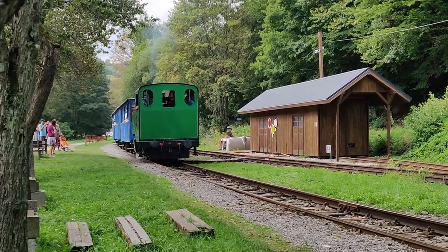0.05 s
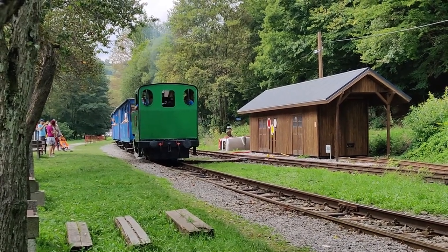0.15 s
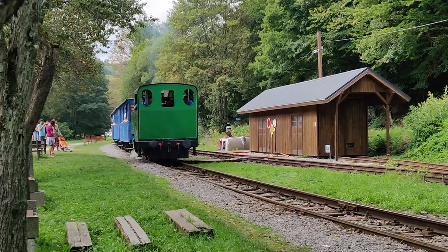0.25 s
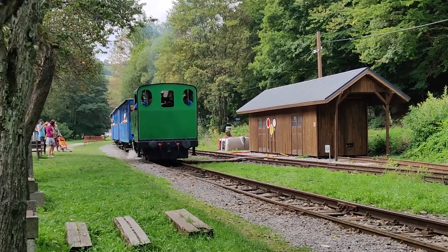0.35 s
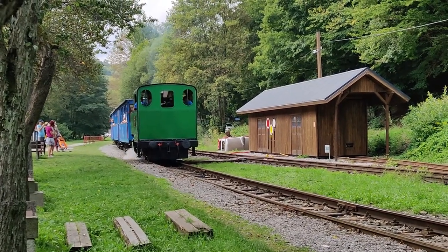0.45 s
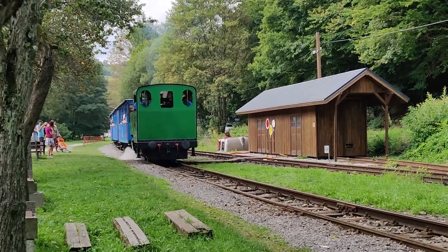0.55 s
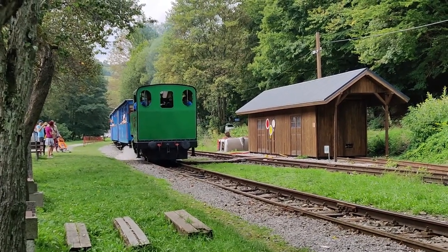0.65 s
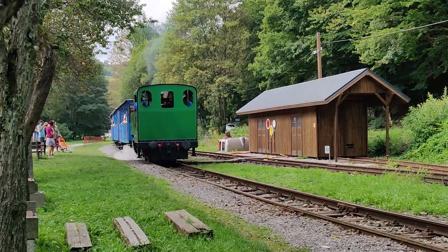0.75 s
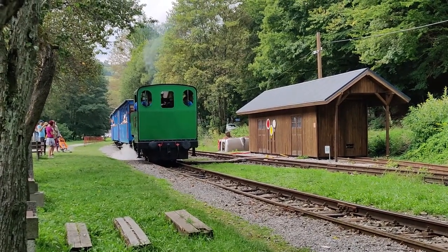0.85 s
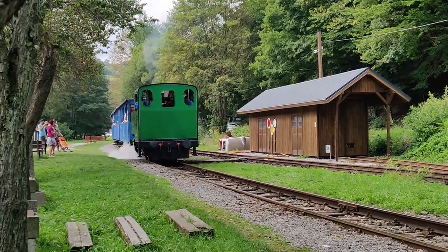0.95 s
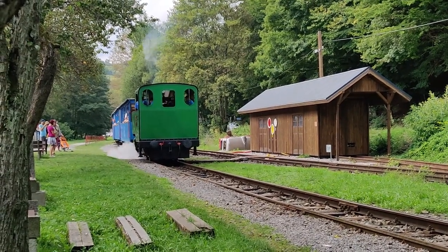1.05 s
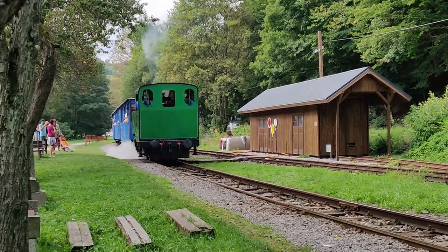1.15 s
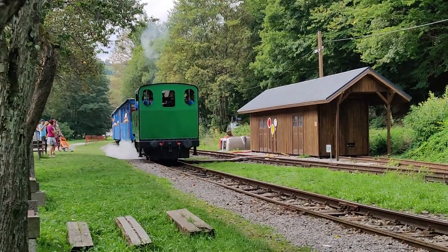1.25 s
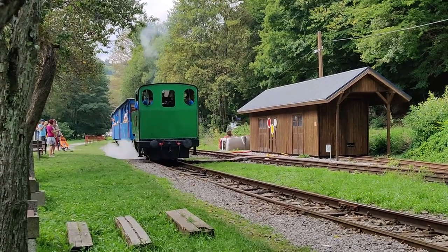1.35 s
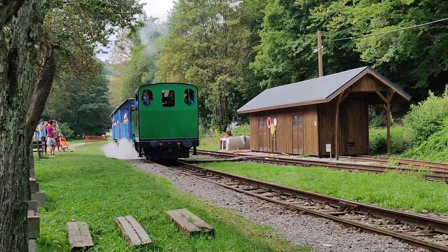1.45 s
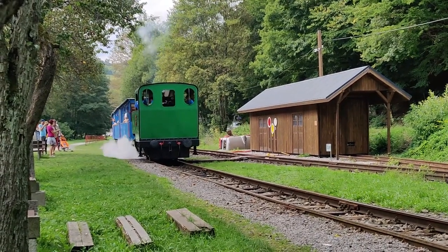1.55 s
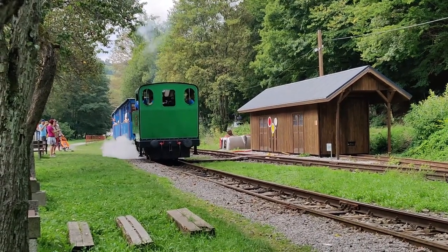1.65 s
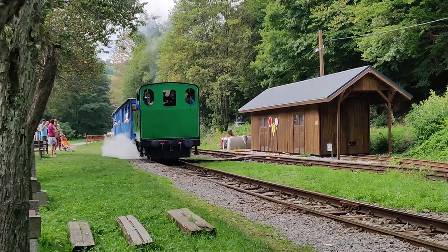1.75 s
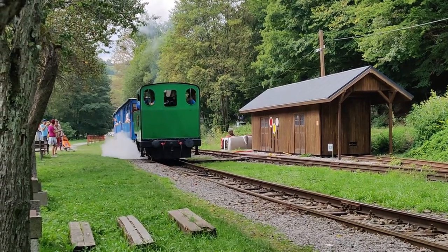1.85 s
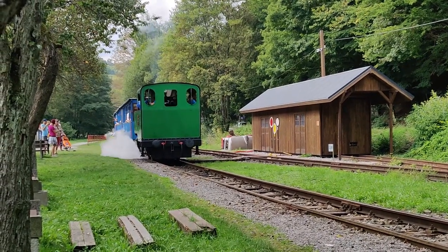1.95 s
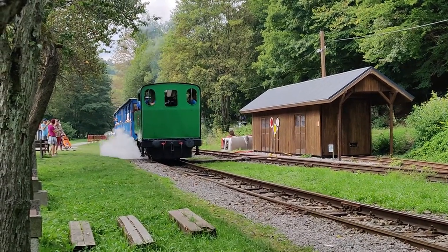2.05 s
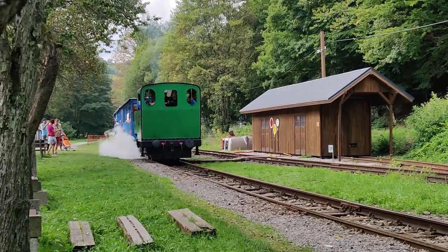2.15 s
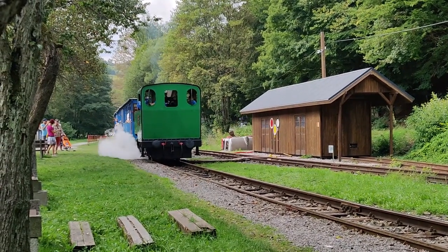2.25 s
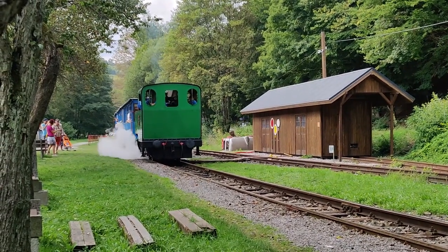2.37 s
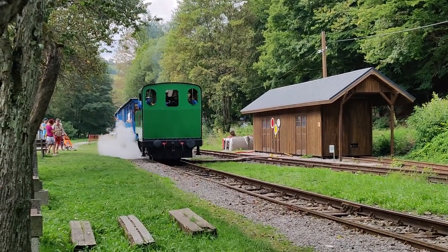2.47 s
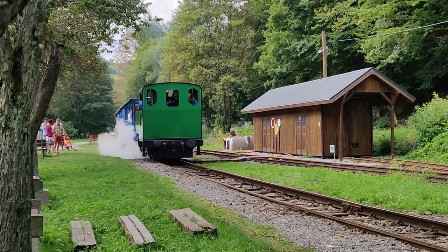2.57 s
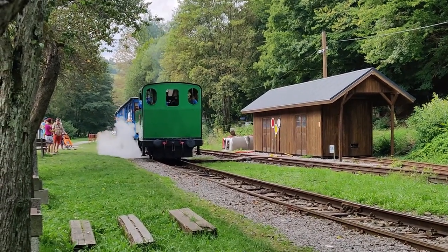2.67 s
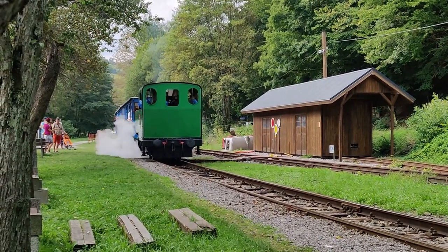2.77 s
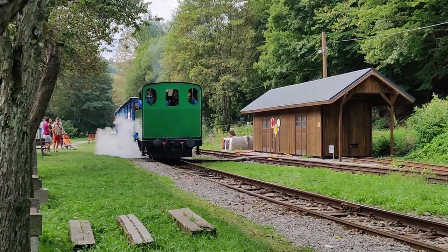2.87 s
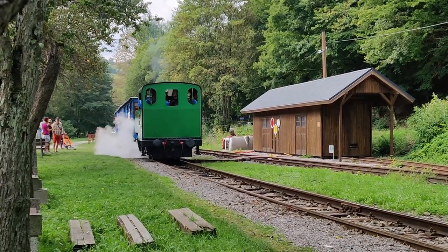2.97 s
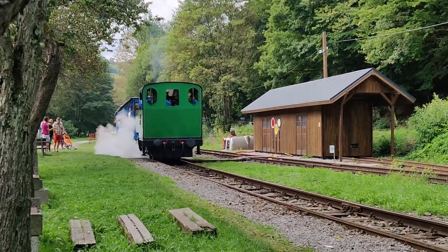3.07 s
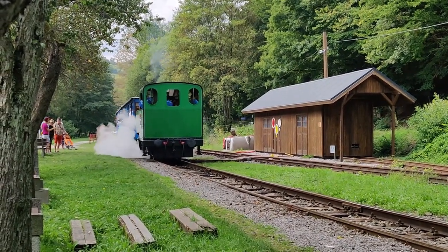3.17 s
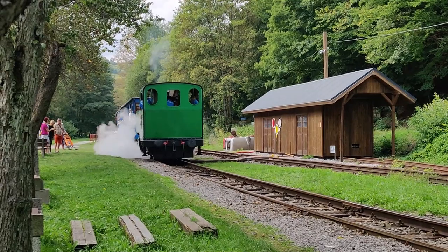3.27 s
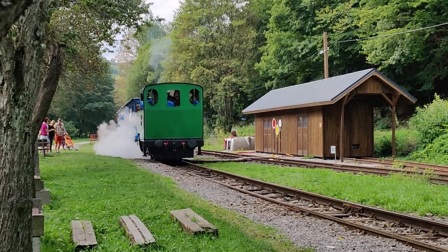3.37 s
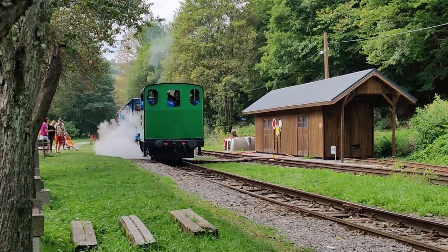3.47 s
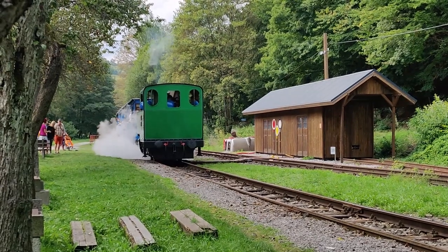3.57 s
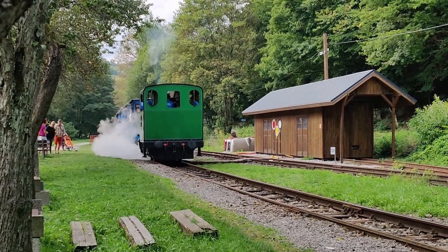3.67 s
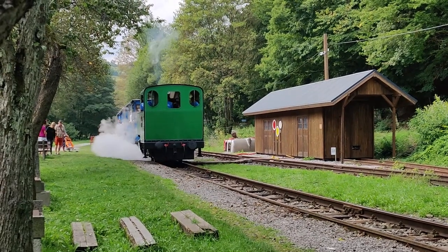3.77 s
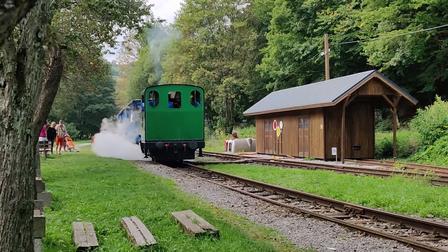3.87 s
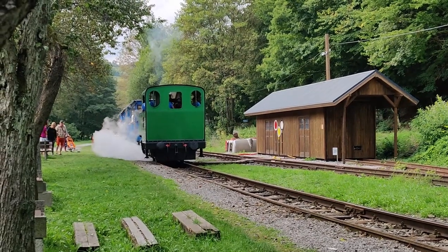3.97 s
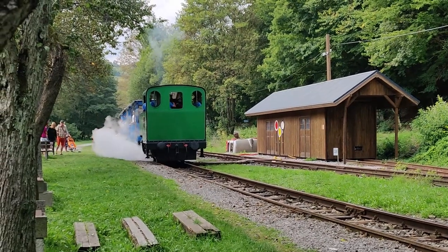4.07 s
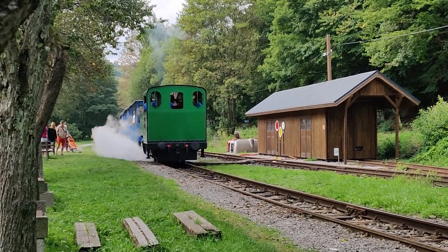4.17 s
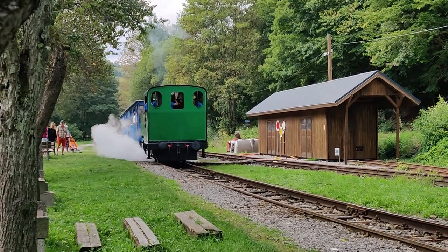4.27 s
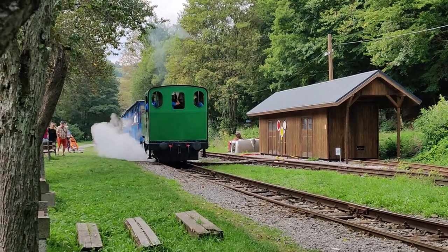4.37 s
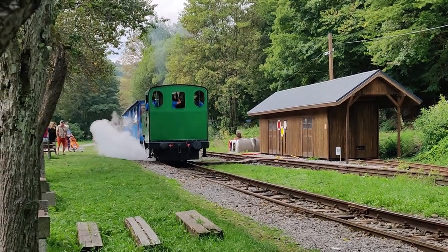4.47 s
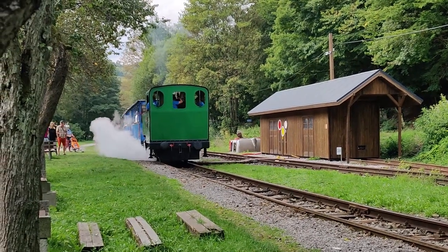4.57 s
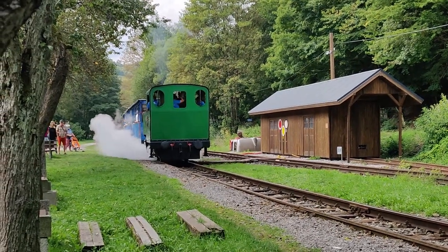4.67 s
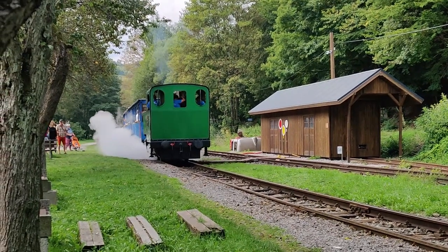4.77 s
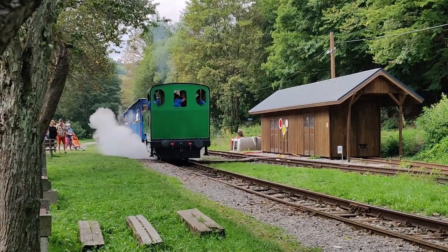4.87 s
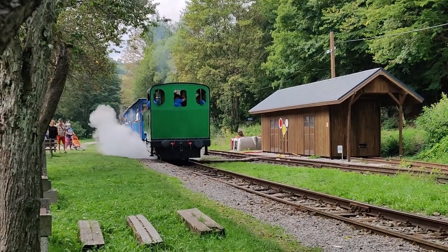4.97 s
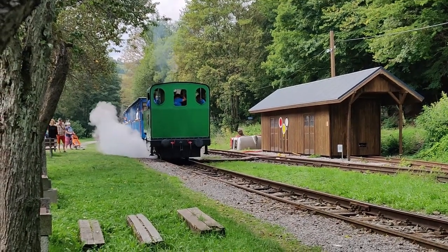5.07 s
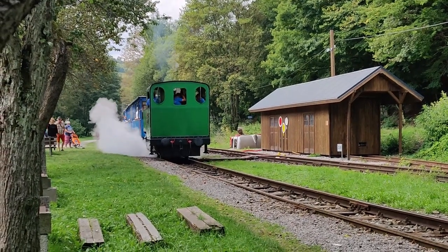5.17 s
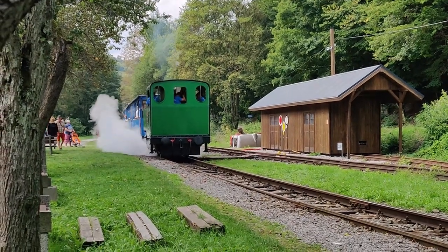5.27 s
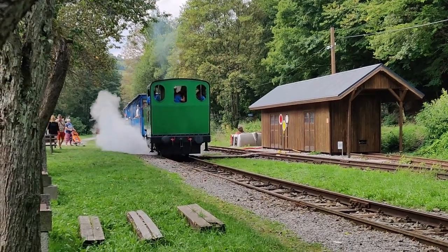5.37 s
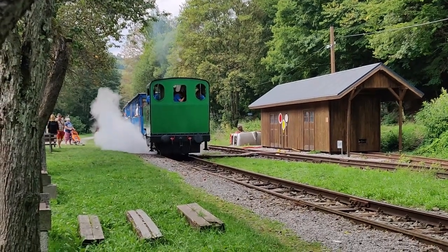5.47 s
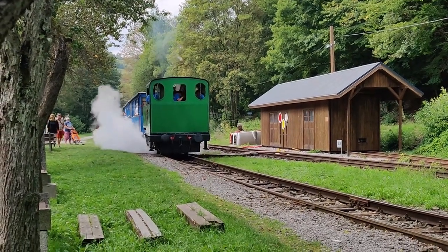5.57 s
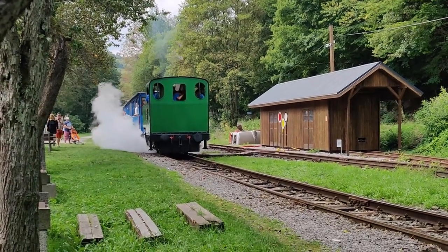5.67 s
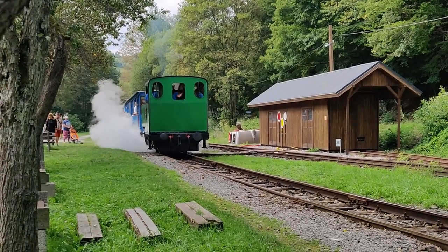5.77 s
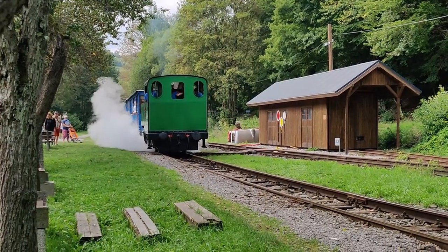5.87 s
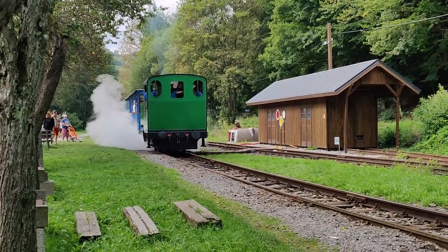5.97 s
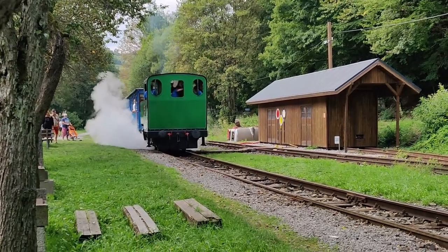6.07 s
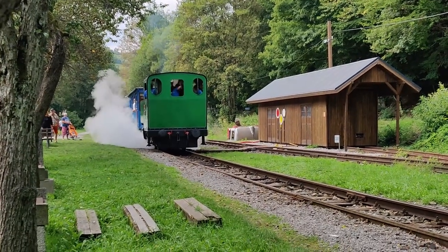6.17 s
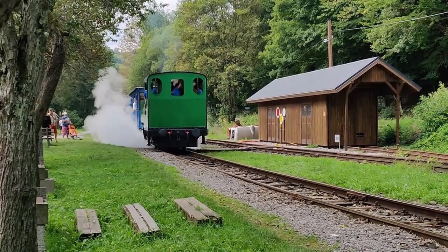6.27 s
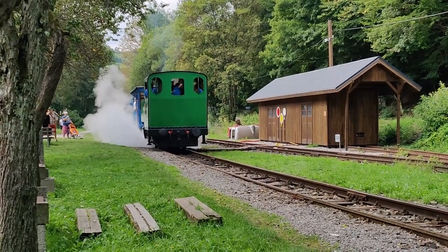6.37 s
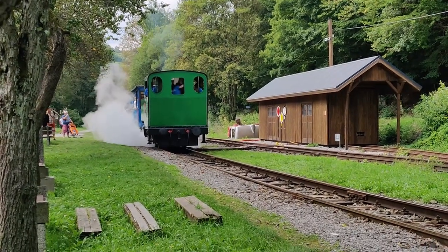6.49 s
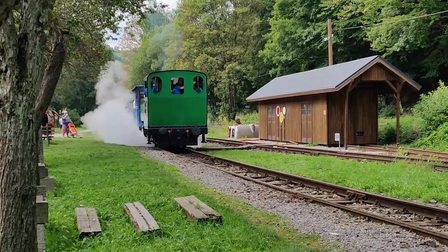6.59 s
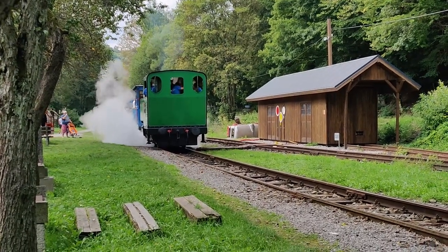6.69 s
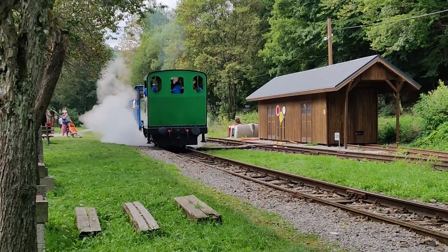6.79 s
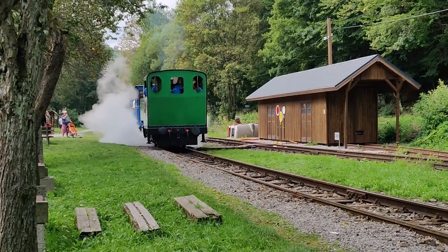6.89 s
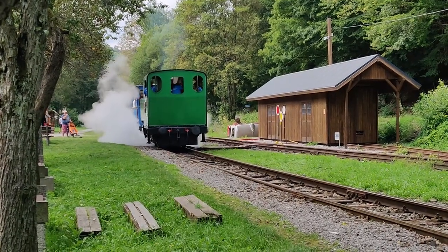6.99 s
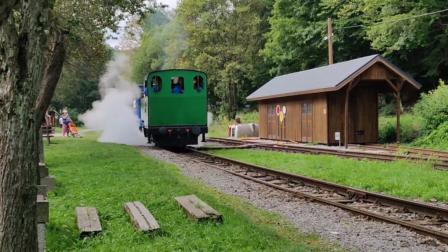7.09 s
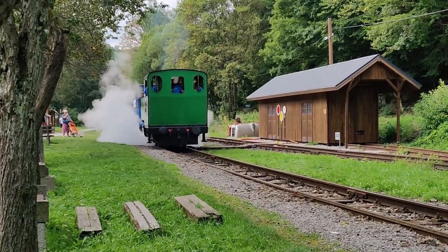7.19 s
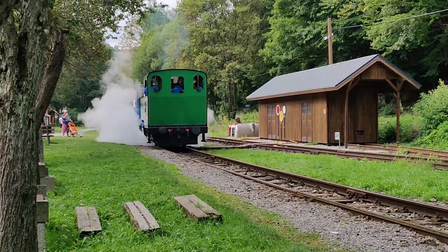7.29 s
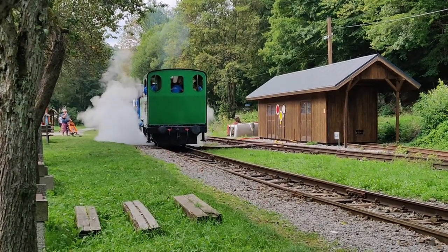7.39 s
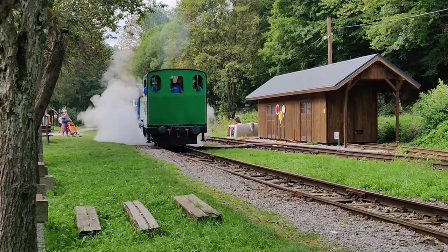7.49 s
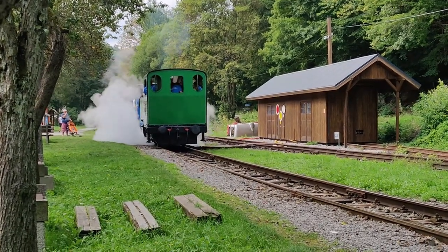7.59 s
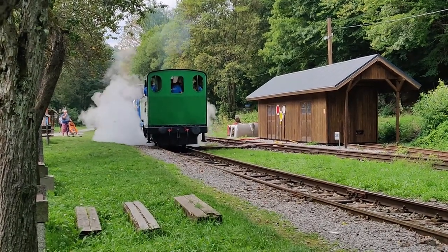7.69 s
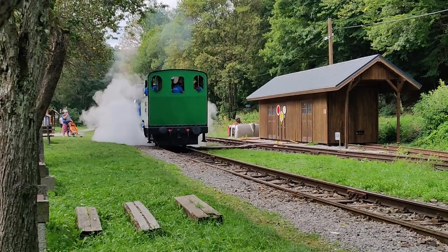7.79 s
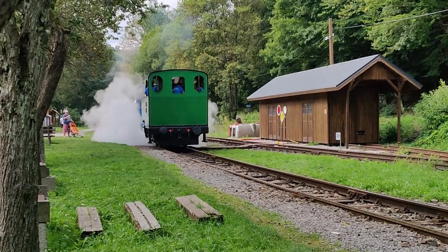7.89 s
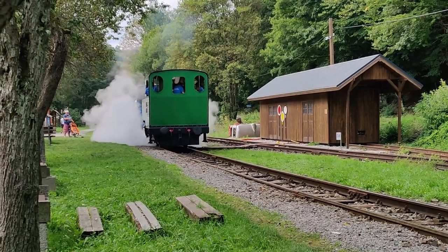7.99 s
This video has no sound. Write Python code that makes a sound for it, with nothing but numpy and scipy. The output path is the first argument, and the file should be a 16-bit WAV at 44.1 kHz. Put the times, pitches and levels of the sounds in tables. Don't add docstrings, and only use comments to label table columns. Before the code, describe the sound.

A steam locomotive stands at a small woodland station, heard from some way off in stereo. A wavering low hum and soft fire rumble come first; almost at once a steam jet opens, swells to a loud broad hiss by about two and a half seconds, then drops and continues steadily. Faint metal squeaks and thumping wind on the hand-held microphone accompany it, with trees scattering the hiss.

```python
import sys
import numpy as np
from scipy import signal
from scipy.fft import rfft, irfft
from scipy.io import wavfile
from scipy.ndimage import uniform_filter1d

SR = 44100
rng = np.random.default_rng(int(sys.argv[2]) if len(sys.argv) > 2 else 0)


def attenuation_scalar(level_db):
    decades = np.asarray(level_db, float) / 20
    return 10 ** decades


def generate_wav(sig):
    pcm = np.round(np.clip(np.atleast_2d(sig).T, -1, 1) * 32767).astype(np.int16)
    wavfile.write(sys.argv[1], SR, pcm)


N = 354563

SIZE, HOP = 1024, 256
HZ = np.fft.rfftfreq(SIZE, 1 / SR)
TIMES = np.arange(N // HOP + 3) * HOP / SR
SECONDS = np.arange(N) / SR


def evened(x):
    return x / np.sqrt(np.mean(abs(x) ** 2) + 1e-20)


def read(points, hz=HZ):
    f, value = np.transpose(points)
    return np.interp(np.log(hz + 1), np.log(f + 1), value)[:, None]


def curves(rows, t):
    s, *columns = np.transpose(rows)
    return [np.interp(t, s, c) for c in columns]


def sides(db):
    return attenuation_scalar(np.array([db / 2, -db / 2]))


def slow(count, size, length=N):
    noise = rng.standard_normal((count, length))
    return [evened(uniform_filter1d(uniform_filter1d(v, size), size)) for v in noise]


def field(count):
    a, b = rng.standard_normal((2, count, len(HZ), len(TIMES)))
    return (a + 1j * b) / np.sqrt(2)


def patches(bins, frames):
    x = rng.standard_normal((len(HZ), len(TIMES)))
    return evened(uniform_filter1d(uniform_filter1d(x, bins, 0), frames, 1))


def sound(z):
    return signal.istft(z, nperseg=SIZE, noverlap=SIZE - HOP)[1][:, :N]


def coherent(a, b, likeness):
    same = np.clip(likeness, 0, 1)
    return np.array([a, same * a + np.sqrt(1 - same ** 2) * b])


def long_noise(spectrum):
    hz = np.fft.rfftfreq(N, 1 / SR)
    return rfft(rng.standard_normal((2, N))) * attenuation_scalar(read(spectrum, hz).T), hz


def air():
    # (frequency [Hz], density [dB per Hz])
    air_colour = [(120, -40), (200, -9), (400, -16.5), (630, -11), (1000, -11), (2000, -19.5),
                  (4000, -26.5), (8000, -33), (11000, -45), (15700, -40)]
    level_db = -48.3
    likeness = read([(200, 1.0), (1000, 0.21), (8000, 0.13)])
    z = coherent(*field(count=2), likeness) * attenuation_scalar(read(air_colour) + patches(bins=10, frames=12))
    return attenuation_scalar(level_db) * evened(sound(z))


def fire():
    # (frequency [Hz], density [dB per Hz])
    rumble_colour = [(15, 6), (40, -2), (75, 1), (100, -3.5), (140, -3), (210, -5.5), (300, -14),
                     (450, -21.5), (900, -42)]
    # (frequency [Hz], share alike [0-1])
    rumble_likeness = [(20, 0.57), (60, 0.96), (140, 1), (300, 0.84), (900, 0.42)]
    start_db, growth_db_per_s, lump_db = -42, 0.68, 0.5
    (a, b), hz = long_noise(rumble_colour)
    x = evened(irfft(coherent(a, b, read(rumble_likeness, hz)[:, 0]), N))
    level_db = start_db + growth_db_per_s * SECONDS + lump_db * slow(count=1, size=4000)[0]
    return x * attenuation_scalar(level_db) * sides(1.0)[:, None]


def blower():
    # (time [s], pitch [Hz], level [dB])
    blower_course = [
        (0, 114, -46),
        (.45, 108.5, -46.5),
        (1.4, 111.3, -46.5),
        (2.75, 115.6, -44),
        (3.7, 115, -46.5),
        (4.3, 116.6, -42),
        (5.4, 118.4, -43.5),
        (6.8, 118, -40.5),
        (7.75, 119.7, -36),
        (8.04, 121, -42.5),
    ]
    # (pitch ratio [1], relative level [dB])
    shaft_orders = [
        (.8, -10.5),
        (1.2, -12),
        (1.47, -18.5),
    ]
    wobble_hz, throb_db, order_throb_db = 1.2, 2.0, 3.0
    hz, db = curves(blower_course, SECONDS)
    wobble, throb, *order_throbs = slow(count=2 + len(shaft_orders), size=3000)
    phase = 2 * np.pi * np.cumsum(hz + wobble_hz * wobble) / SR
    tone = attenuation_scalar(throb_db * throb) * np.sin(phase)
    for (ratio, rel_db), order_throb in zip(shaft_orders, order_throbs):
        tone = tone + attenuation_scalar(rel_db + order_throb_db * order_throb) * np.sin(ratio * phase)
    return np.sqrt(2) * tone * attenuation_scalar(db) * sides(1.5)[:, None]


def squeaks():
    # (time [s], length [s], pitch [Hz], level [dB], left minus right [dB])
    strain_tones = [(0.0, 0.16, 635, -52, 0), (0.172, .2, 630, -55.5, 0), (.37, 0.13, 184, -40.5, 1),
                    (.5, .38, 630, -54, -1), (.72, 0.11, 720, -51, -2), (0.632, 0.15, 211.5, -50, 0),
                    (2.8, 0.27, 630, -53, -4), (4.585, 0.2, 701, -49, 0), (4.599, 0.239, 636, -49, 1),
                    (5.721, 0.12, 2200, -46, 3), (7.063, 0.36, 1085, -49, -9), (7.27, .14, 213, -47, 0),
                    (7.3, 0.21, 1060, -52, 8)]
    # (time [s], length [s], start pitch [Hz], end pitch [Hz], level [dB])
    pipe_moan = (0.1, 1.3, 63.5, 77, -46.5)
    sag_per_s, fuzz = 0.06, 0.0272
    glides = [(*pipe_moan, 0)]
    for s, length, hz, db, pan_db in strain_tones:
        glides.append((s, length, hz, hz * (1 - sag_per_s * length), db, pan_db))
    out = np.zeros((2, N))
    for s, length, start_hz, end_hz, db, pan_db in glides:
        n = round(length * SR)
        wobble = evened(uniform_filter1d(rng.standard_normal(N // 4), 400))[:n]
        hz = np.linspace(start_hz, end_hz, n) * (1 + fuzz * wobble)
        tone = np.sqrt(2) * np.sin(2 * np.pi * np.cumsum(hz) / SR) * signal.windows.tukey(n, 0.6)
        out[:, round(s * SR):][:, :n] += attenuation_scalar(db) * sides(pan_db)[:, None] * tone
    return out


def gusts():
    # (time [s], peak level [dB], left minus right [dB])
    gust_peaks = [(0.0, -33.5, 8), (.3, -38, 2), (.67, -35, -12), (1.0, -38, 4), (1.75, -35, 9.5),
                  (2.03, -27, 1), (2.2, -34, -3), (2.65, -39, 2), (2.4, -36.5, -4), (3.0, -41, 0),
                  (3.35, -38.5, -2), (3.65, -38, 0), (3.85, -32, 0), (4.25, -31.5, 1), (4.55, -41, 1),
                  (4.78, -33, -10), (5.04, -32, 5), (5.36, -30.5, 7), (5.6, -33, 9), (5.95, -32, 10),
                  (6.22, -32, 4), (6.55, -35, 0), (7.1, -38, -5), (7.3, -42, 0), (7.57, -37, 14),
                  (8.02, -33, 9)]
    gust_s, calm_db = 0.086, -42
    power = attenuation_scalar(2 * calm_db)
    for s, db, pan_db in gust_peaks:
        bell = np.exp(-0.5 * ((TIMES - s) / gust_s) ** 2)
        power = power + (attenuation_scalar(db) * sides(0.61 * pan_db)[:, None] * bell) ** 2
    return np.array([np.interp(SECONDS, TIMES, np.sqrt(p)) for p in power])


def wind():
    # (frequency [Hz], density [dB per Hz])
    wind_colour = [(3, -4), (10, 8), (16, -2), (25, 1), (45, -0.5), (80, -10.5), (150, -27), (300, -58)]
    # (time [s], peak level [dB], frequency [Hz], length [cycles], left minus right [dB])
    buffet_events = [(.27, -29, 35, 1.5, 14), (.47, -29, 38, 2.1, 13), (1.56, -32, 65, 5.7, 24),
                     (1.69, -32, 55, 2.3, 21), (1.775, -30, 60, 2.6, 26), (1.995, -24.5, 36, 1.1, 9),
                     (2.05, -27, 25, 1.1, 6), (2.71, -28.5, 40, 1.7, 10), (2.74, -32, 70, 4.9, 1),
                     (4.996, -25, 60, 2, 2), (5.04, -32, 30, 1.6, 14), (5.33, -23.5, 36.6, 1.5, 25),
                     (5.479, -25, 45, 2.1, 17), (5.935, -25, 42, 1.8, 13), (7.41, -43, 45, 1.8, 3)]
    x = irfft(long_noise(wind_colour)[0], N)
    x = x / abs(uniform_filter1d(x ** 2, 4000)) ** 0.25
    out = evened(x) * attenuation_scalar(-1.5) * gusts()
    for s, db, hz, cycles, pan_db in buffet_events:
        turns = np.arange(0, cycles, hz / SR)
        push = -np.sin(2 * np.pi * turns) * np.hanning(len(turns))
        port = sides(pan_db)[:, None]
        out[:, round(s * SR):][:, :len(push)] += attenuation_scalar(db) * port / port.mean() * push
    return out


def evened_band(z):
    band = (HZ > 3000) & (HZ < 8000)
    return np.sqrt(np.mean(sound(z.mean(0, keepdims=True) * band[:, None]) ** 2))


def arrivals(low, high, pitch):
    # (frequency [Hz], share [0-1])
    direct_share = [(300, 0.55), (600, 0.46), (900, 0.01), (1400, 0.42), (2500, 0.52), (3800, 0.16),
                    (4700, 0.19), (5900, 0.28), (7200, 0.35), (8700, 0.56), (10000, 0.37), (10700, 0.42),
                    (12500, 0.35), (16000, 0.6)]
    # (frequency [Hz], width [Hz], left [dB], right [dB])
    port_rings = [(617, 120, 0, 4.5), (1068, 150, 6, 9.5), (1352, 163, 8, 6), (1633, 68, 1, 5),
                  (2640, 56, 6, 4.5), (3240, 88, 5, 2.5), (4440, 230, 10.5, 5), (4680, 160, 3, -1),
                  (5038, 420, 15.5, 10), (5300, 200, -1.5, 2), (6340, 270, 3, 5.5), (6880, 310, 1, 8),
                  (7430, 250, -5, 6.5), (7850, 240, 5, 5.5), (8330, 290, 11.5, 4), (9700, 440, 7, 5),
                  (13900, 250, 4, -6)]
    # (frequency [Hz], lead of the left [rad])
    port_lead = [(0, -4), (600, 0.2), (900, 1.5), (1300, 0.56), (2300, 0.82), (3400, 1.77), (4000, 1.7),
                 (4300, 0.48), (5400, 0.67), (6300, 1.6), (7600, 3.5), (10500, 3.5), (12300, 4.5),
                 (15900, 5)]
    # (time [s], direct treble [dB])
    cloud_course = [
        (.25, -6),
        (.7, 4),
        (2.8, 1.5),
        (3.4, 2.5),
        (4, -3.5),
        (5, -5.5),
        (6.1, -4),
        (7.4, 0.2),
        (8.04, -7),
    ]
    top_spared = 0.65
    clear_db = curves(cloud_course, TIMES)[0]
    cloud_db = (1 - low) * (1 - top_spared * high) * clear_db
    odds = 1 / (1 / np.clip(read(direct_share), 0.01, 0.99) - 1) * attenuation_scalar(2 * cloud_db)
    share = odds / (1 + odds)
    hz, width, *port_db = np.transpose(port_rings)
    ring = 1 / (1 + (2 * (HZ[:, None] - hz) / width) ** 2)
    shifted = HZ[:, None] / (low + (1 - low) * pitch)
    rings = np.array([np.interp(shifted, HZ, attenuation_scalar(ring @ db)) for db in port_db])
    turn = np.exp(0.5j * read(port_lead))
    direct, left, right = field(count=3)
    common = rings * direct * np.array([turn, 1 / turn])
    return np.sqrt(share) * common + np.sqrt(1 - share) * np.array([left, right])


def jet():
    # (time [s], jet pressure [dB], spray of droplets relative [dB])
    jet_course = [(0.25, -62, -13), (0.31, -48.5, -10), (0.4, -38, -7), (0.52, -32.5, -5.5),
                  (0.76, -30, -5.5), (1.26, -26, -6.5), (2.61, -24, -5), (2.72, -25, -7.5),
                  (3.3, -30.5, -8.5), (3.48, -29, -7.5), (3.93, -29.5, -7), (5.17, -31.5, -9.5),
                  (5.91, -31.5, -7.5), (6.11, -29, -8), (6.34, -31.5, -7), (6.63, -28.5, -7),
                  (7.5, -28.5, -7.5), (8.04, -30.5, -8.5)]
    # (frequency [Hz], density [dB per Hz])
    hiss_colour = [(180, -39), (300, -16), (455, -15.5), (614, -9), (842, -10.5), (1360, -8.5), (2170, -9),
                   (3000, -5.5), (3950, -3.5), (4910, -2.5), (7440, -3), (8640, -8), (11500, -8),
                   (15700, -10)]
    # (frequency [Hz], left minus right [dB])
    port_tilt = [(60, 2.5), (92, 2.0), (140, 3), (210, -5), (330, 1.5), (500, 1), (770, 2.5), (1170, -1.5),
                 (1790, 0.0), (2740, 0.5), (4190, 2.5), (6410, -6), (9810, -2), (15000, -1)]
    choke_db, roar_follow, roar_db_per_s = -31.5, 0.57, 0.54
    turn_db_per_s, sway_db = -0.1, 0.5
    ring_pitch, ring_wander = 0.99, 0.0083
    patchy_db, broad_db, spit_db, flutter_db, trim_db = 0.4, 0.35, 0.7, 0.27, 0.04
    pressure_db, fizz_db = curves(jet_course, TIMES)
    roar_db = roar_follow * np.minimum(pressure_db - choke_db, 0) + roar_db_per_s * TIMES - pressure_db
    sway, drift = slow(count=2, size=24, length=len(TIMES))
    pan_db = turn_db_per_s * TIMES + sway_db * sway
    high = read([(7600, 0.014), (9200, 0.89)])
    low = read([(1800, 0.98), (3000, 0.16)])
    change_db = high * (fizz_db - np.median(fizz_db)) + low * (roar_db - np.median(roar_db))
    eddies_db = patchy_db * patches(bins=14, frames=10) + broad_db * patches(bins=200, frames=14)
    eddies_db = eddies_db + spit_db * high * patches(bins=400, frames=9)
    z = arrivals(low, high, ring_pitch + ring_wander * drift)
    z = z * attenuation_scalar(read(hiss_colour)) * sides(read(port_tilt))
    z = z / evened_band(z) * attenuation_scalar(change_db + eddies_db)
    z = z * sides((1 - low) * (pan_db - np.median(pan_db)))
    opening = np.clip((SECONDS - jet_course[0][0]) / 0.05, 0, 1)
    flutter = slow(count=1, size=900)[0]
    level_db = np.interp(SECONDS, TIMES, pressure_db) + flutter_db * flutter + trim_db
    return sound(z) * opening * attenuation_scalar(level_db)


def scene():
    return air() + fire() + blower() + squeaks() + wind() + jet()


def roll_off(x):
    return signal.sosfilt(signal.butter(12, 15750, fs=SR, output="sos"), x)


def record(dry):
    return roll_off(dry)


dry = scene()
out = record(dry)
generate_wav(out)
```